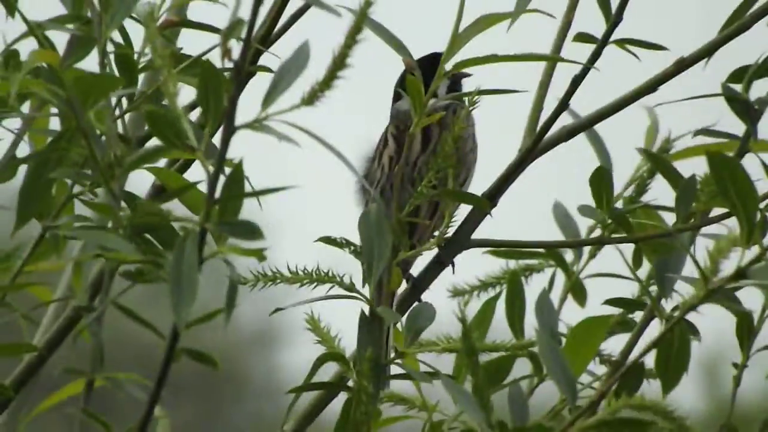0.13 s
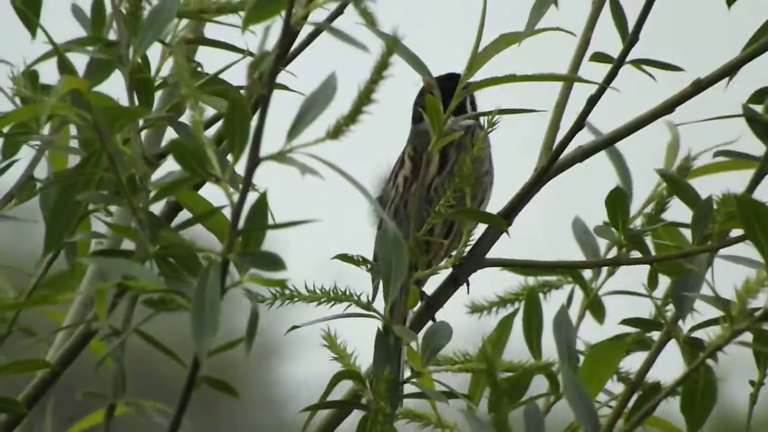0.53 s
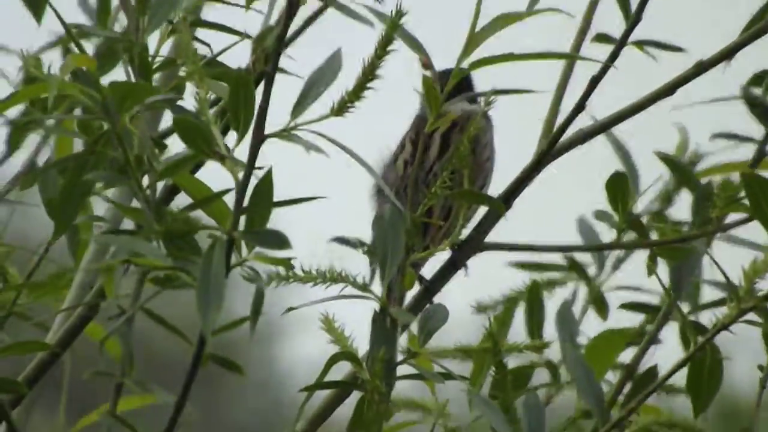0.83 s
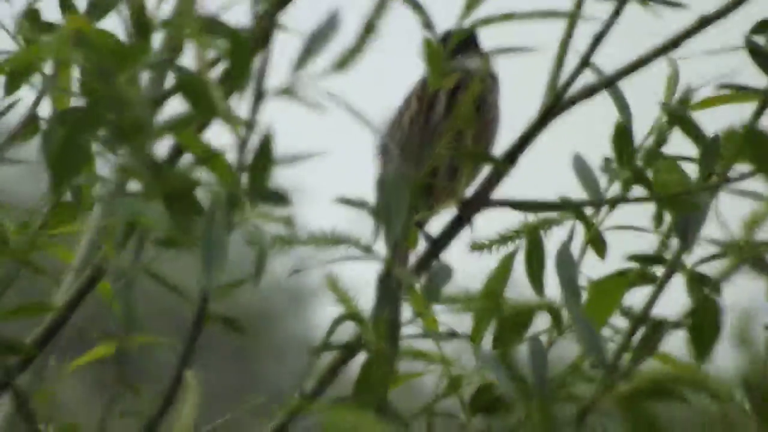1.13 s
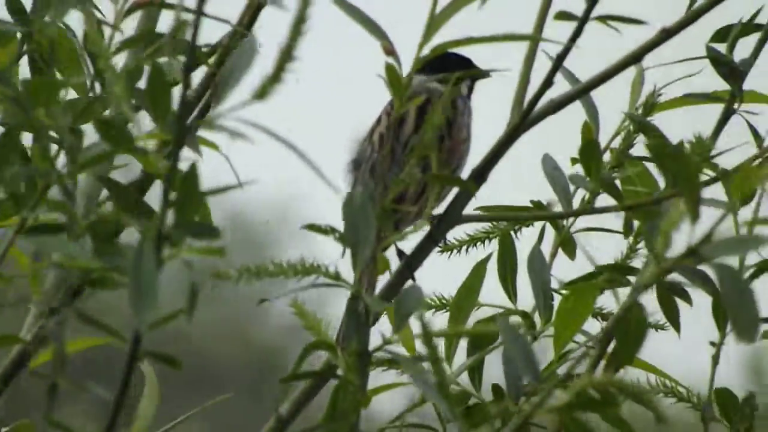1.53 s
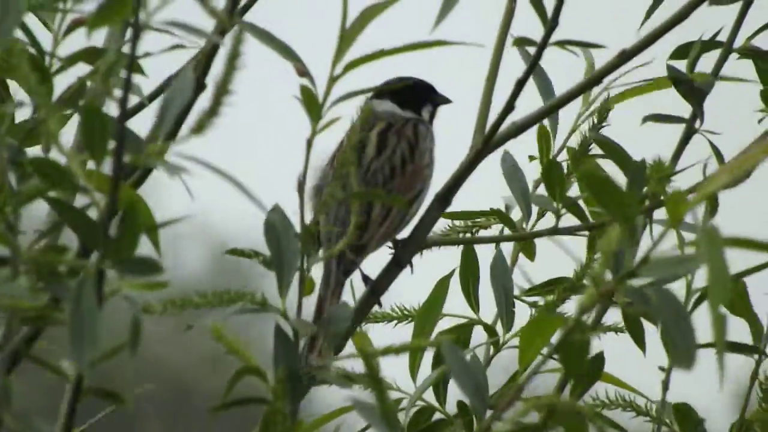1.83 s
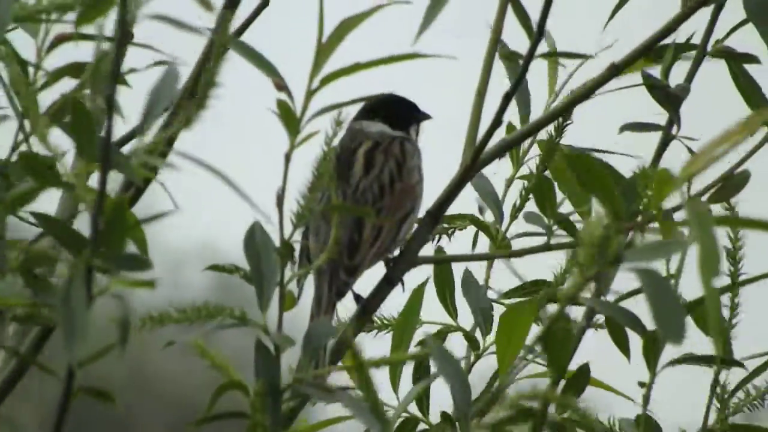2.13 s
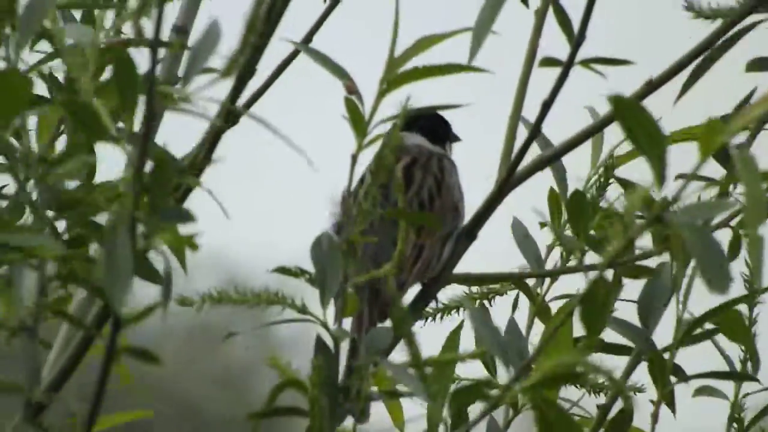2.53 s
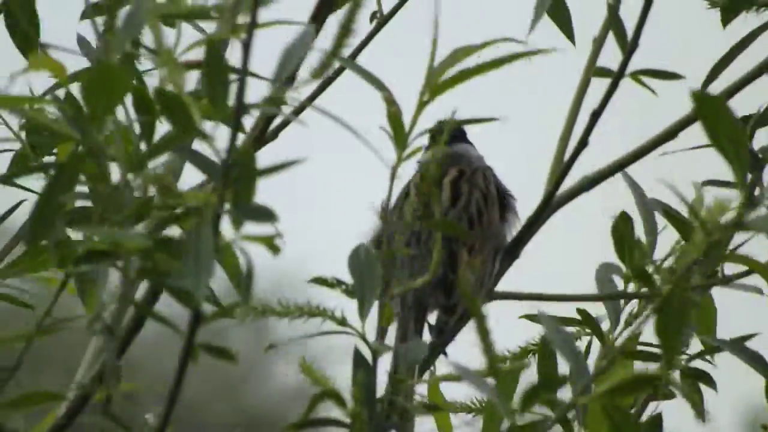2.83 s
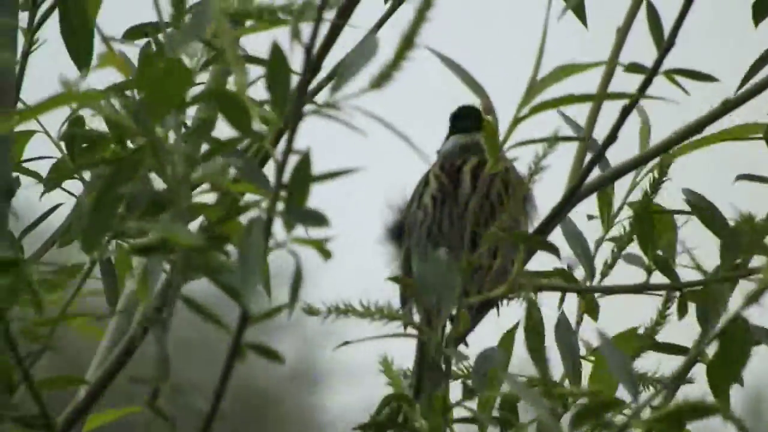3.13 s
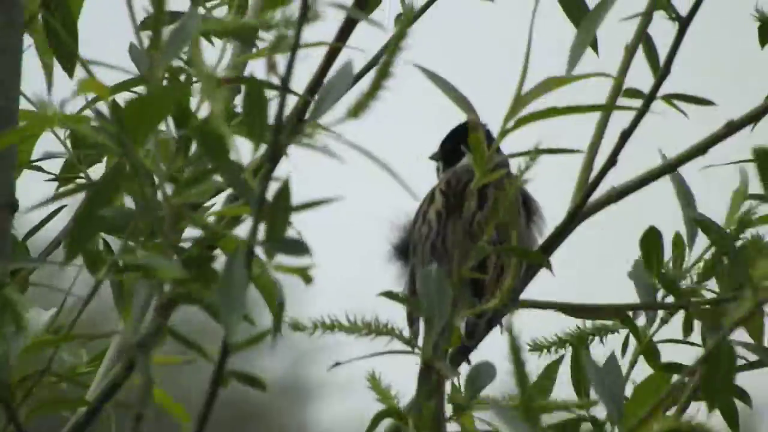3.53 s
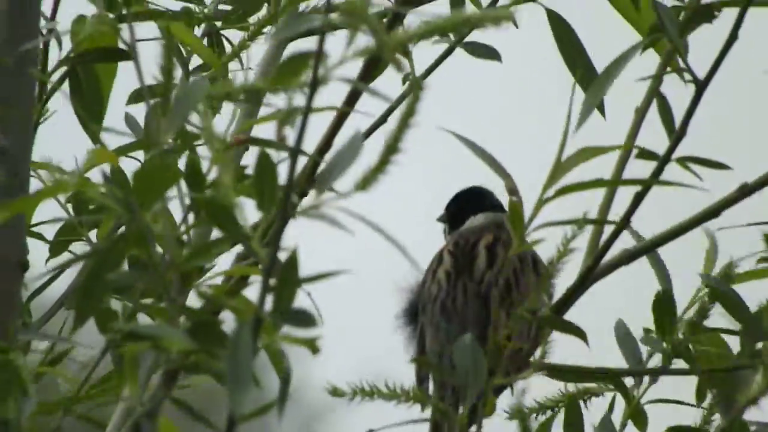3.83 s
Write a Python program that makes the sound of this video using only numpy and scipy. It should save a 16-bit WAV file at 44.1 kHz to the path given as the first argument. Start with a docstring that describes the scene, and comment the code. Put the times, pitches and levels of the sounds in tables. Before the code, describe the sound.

A small songbird a few metres away sings quick whistles, a buzz and two short trills. Fainter birds then chip and whistle among the trees, a twig snaps, and light wind rumbles on the microphone.

```python
"""Songbird in light wind.

A small bird a few metres off ends its phrase: whistled sweeps, a long buzz, two short trills.
Further away, birds whistle, chip and grunt over a faint chorus. All calls are modulated tones.
A twig snaps, ringing its resonances. Foliage scatters echoes; wind rumbles on the microphone.
Narrow stereo: the left channel lags by one sample."""
import sys
import numpy as np
from scipy import signal
from scipy.fft import rfft, irfft
from scipy.io import wavfile
from scipy.ndimage import uniform_filter1d

SR = 44100
rng = np.random.default_rng(int(sys.argv[2]) if len(sys.argv) > 2 else 0)


def digitize_waveform(pressure):
    """Quantize a signal to 16-bit integers and store it at the path in sys.argv[1].

    Rows of a 2-D input are taken as channels; values are limited to [-1, 1].
    """
    field = np.atleast_2d(pressure).T
    bounded = np.clip(field, -1, 1)
    quanta = np.round(bounded * 32767).astype(np.int16)
    wavfile.write(sys.argv[1], SR, quanta)


N = 176400

# near whistles, one curve per note: t/s, f/Hz, level/dB
NEAR_NOTES = [
    [(0.0, 4530, -10), (0.008, 4620, -18.5), (0.016, 4790, -12.5)],
    [(0.002, 3720, -50), (0.01, 3610, -23), (0.025, 3910, -19), (0.038, 4200, -13.5), (0.045, 4400, -12)],
    [(0.104, 5550, -48), (0.112, 6200, -34), (0.12, 6550, -32), (0.13, 6400, -33), (0.145, 6060, -27.5),
     (0.155, 6090, -31), (0.159, 6600, -32), (0.163, 8220, -43), (0.167, 7440, -59), (0.171, 6030, -34),
     (0.175, 4930, -14.5), (0.18, 4520, -10.5), (0.19, 4060, -19.5)],
    [(0.406, 3370, -26), (0.415, 3220, -23), (0.424, 3130, -24)],
    [(0.443, 3640, -40), (0.446, 3350, -15), (0.45, 3250, -30)],
    [(0.478, 5560, -52.5), (0.495, 5010, -25), (0.511, 4590, -13.5), (0.515, 5480, -36.5),
     (0.518, 4340, -21), (0.524, 4210, -18.5), (0.535, 4020, -37), (0.552, 4120, -39)],
    [(0.582, 5080, -45), (0.588, 5500, -53), (0.597, 4960, -26), (0.607, 4670, -17), (0.612, 6170, -49),
     (0.616, 4420, -21), (0.622, 4140, -20), (0.632, 4250, -42), (0.645, 4330, -38)],
    [(0.702, 6380, -46), (0.707, 4420, -28), (0.712, 6200, -40.5), (0.718, 6700, -52), (0.727, 6960, -50.2),
     (0.745, 6670, -46), (0.772, 6900, -62.5)],
    [(0.752, 3510, -40), (0.775, 3556, -27.5), (0.795, 3820, -25.5), (0.802, 3510, -19), (0.808, 3120, -16)],
    [(0.805, 5245, -40.5), (0.812, 4180, -26), (0.822, 3493, -26.5), (0.828, 3320, -35), (0.84, 3370, -31),
     (0.855, 3000, -26)],
]
# long buzz: t/s, f/Hz, level/dB, warble rate/Hz, depth/Hz, throb/0-1
BUZZ_CURVE = [(.188, 4050, -19, 172, 60, 0), (.204, 3830, -20, 171, 260, .1),
              (.228, 3830, -15.5, 170, 290, .1), (.3, 3540, -16.5, 163.5, 350, .15),
              (.33, 3430, -17.5, 160, 390, .75), (.347, 3330, -21, 160, 330, .8),
              (.353, 3150, -18, 160, 120, .35), (.366, 3230, -21, 160, 30, 0)]
# trills: t/s, length/s, f/Hz, level/dB, swell/dB, warble rate/Hz, depth/Hz, throb/0-1, end sag/Hz
TRILL_NOTES = [(0.4515, 0.0365, 3400, -22, 6, 98, 130, 0.22, 250),
               (0.5462, .0385, 3260, -19.5, 5, 104, 90, 0.72, 20)]
# far whistles, one curve per note: t/s, f/Hz, level/dB
FAR_NOTES = [
    [(0.095, 972, -51), (0.11, 1010, -47), (0.135, 984, -48)],
    [(0.147, 2930, -26), (0.16, 2950, -26), (0.18, 2760, -26.5)],
    [(0.195, 1128, -53), (0.215, 1059, -47), (0.255, 1043, -44), (0.3, 1016, -57)],
    [(0.31, 1322, -45), (0.36, 1354, -45), (0.44, 1361, -49.5)],
    [(0.505, 995, -47), (0.54, 1016, -46.5), (0.585, 1013, -51)],
    [(0.585, 3550, -43.5), (0.61, 3710, -36.5), (0.635, 4040, -40)],
    [(0.935, 1347, -46), (0.98, 1350, -49.5), (1.02, 1365, -49)],
    [(0.992, 4560, -34), (1.0, 3960, -43), (1.015, 3700, -30), (1.035, 3720, -43), (1.052, 4000, -41),
     (1.065, 3990, -36)],
    [(1.07, 3390, -29), (1.09, 3440, -38), (1.125, 3560, -29)],
    [(1.105, 1013, -52), (1.13, 1080, -51), (1.155, 1060, -56)],
    [(1.18, 1165, -53), (1.215, 1010, -54)],
    [(1.31, 3570, -66), (1.33, 3430, -27), (1.35, 3430, -46)],
    [(1.42, 4320, -43), (1.445, 4300, -45), (1.47, 4320, -45)],
    [(1.473, 4380, -36), (1.48, 3820, -43), (1.492, 3307, -21.5), (1.505, 3590, -35), (1.53, 3460, -30.5),
     (1.545, 3620, -32), (1.558, 4130, -36), (1.57, 3920, -40)],
    [(1.555, 2880, -43), (1.6, 2900, -53), (1.645, 2809, -34), (1.668, 3340, -33.5)],
    [(1.6, 1330, -47), (1.63, 1339, -47), (1.665, 1380, -52)],
    [(1.81, 3024, -35), (1.83, 2950, -40), (1.86, 2880, -40)],
    [(1.908, 2745, -28), (1.92, 2760, -30), (1.93, 3060, -46)],
    [(2.43, 3590, -43), (2.445, 3330, -38), (2.458, 3060, -34)],
    [(2.69, 2770, -63), (2.705, 3020, -38.4), (2.73, 3100, -34.5), (2.77, 3170, -42)],
    [(2.885, 3170, -33), (2.9, 3290, -36), (2.915, 3230, -35)],
    [(3.165, 4050, -45), (3.175, 3770, -41), (3.195, 3830, -48)],
    [(3.295, 4140, -42), (3.315, 3770, -33), (3.335, 3950, -44), (3.35, 4080, -39), (3.4, 4060, -52)],
    [(3.31, 4670, -42), (3.325, 4360, -42), (3.34, 4570, -58)],
    [(3.325, 2093, -41), (3.35, 2140, -46), (3.39, 2210, -49)],
    [(3.372, 4000, -45), (3.39, 3430, -34.5), (3.403, 3130, -30)],
    [(3.4, 2960, -38), (3.44, 2985, -39), (3.485, 2980, -40)],
    [(3.435, 6800, -72.1), (3.47, 6090, -54.5), (3.53, 5360, -59)],
    [(3.445, 2330, -44), (3.49, 1977, -46), (3.56, 1560, -51)],
    [(3.65, 3100, -29.5), (3.67, 3190, -30), (3.715, 3148, -26.5), (3.745, 3110, -41), (3.78, 3115, -36)],
    [(3.7, 2310, -44), (3.75, 2225, -45), (3.8, 2172, -45), (3.84, 2270, -39), (3.9, 2326, -39.5),
     (3.96, 2340, -57)],
    [(3.72, 1910, -50), (3.75, 1930, -51), (3.82, 1960, -45)],
    [(3.76, 4800, -47), (3.78, 4340, -49)],
    [(3.82, 3150, -35), (3.85, 3130, -38), (3.88, 3410, -33)],
    [(3.86, 3550, -53), (3.9, 3494, -43), (3.925, 3570, -33)],
    [(3.865, 5690, -61), (3.92, 5700, -58), (3.985, 6010, -78)],
]
# rattle on a whistle: start/s, end/s, rate/Hz, depth/Hz, throb/dB
NEAR_NOTE_RATTLE = (.752, .799, 250, 170, 4.)
FAR_NOTE_RATTLE = (.286, .45, 27.5, 45, 6.)
# rising chips: t/s, peak/dB
CHIP_CALLS = [(1.142, -21.5), (1.2275, -21.5), (1.3295, -20), (1.4305, -21), (1.5295, -21.5),
              (1.646, -27.5), (1.7733, -26)]
# twig crackles: t/s, push/dB, t60/s, contact/ms
CRACKLES = [(1.2045, -7, .3, .1), (1.206, -3, 0.11, 0.09), (1.2084, 0, 0.028, .1), (1.21, 10, .01, .02),
            (1.2135, 1, .2, 0.11), (2.92, -2, 0.013, 0.4), (2.9222, -6, .03, .6)]
# twig resonances: f/Hz, width/Hz, gain/dB
TWIG_MODES = [(2775, 330, 2), (3140, 306, 7.5), (4100, 1470, -11.5), (1040, 550, -26), (1990, 1300, -24),
              (6300, 1700, -18.5), (9900, 1900, -19.5), (13500, 7900, -33)]
# far bird's grunts: t/s, level/dB, f/Hz
GRUNT_CALLS = [(0.812, -39, 300), (0.913, -37, 260), (1.005, -38.5, 259.6), (1.105, -35.5, 267.4),
               (1.142, -37, 248), (1.197, -42, 303)]
# grunt harmonics 1-4: gain/dB
GRUNT_HARMONICS_DB = [0, -13, -25, -10.5]
# wind rumble: t/s, level/dB
WIND_LEVEL = [(0.0, -26.5), (0.52, -32), (0.99, -33.5), (1.22, -31), (1.41, -32), (1.56, -32.5),
              (1.77, -27), (1.99, -26.5), (2.22, -25.5), (2.39, -28.5), (2.55, -28), (3.16, -27.5),
              (3.55, -35.5), (3.75, -34.5), (4.0, -18.5)]
# rumble spectrum: f/Hz, relative density/dB
WIND_SPECTRUM = [(5.9, -33), (10, 1.5), (21, 0.5), (36, -7.5), (63, -15.5), (97, -24.5), (130, -37),
                 (170, -60), (290, -120)]
# buffets on the microphone: centre t/s, peak/dB, f/Hz, length/s
WIND_BUFFETS = [(1.596, -21.5, 45, 0.057), (2.345, -20, 29.8, 0.074), (3.018, -14, 50.3, 0.041),
                (3.263, -18, 40.9, 0.18), (3.939, -23, 49.5, 0.061)]
# low rustle: centre t/s, level/dB, half-width/s
LOW_RUSTLE = (2.67, -43, 0.1)
# dawn chorus: t/s, level/dB
CHORUS_LEVEL = [(0, -40), (.8, -41.5), (1.6, -44.5), (2.4, -47), (3.2, -44), (4, -48.5)]
# ambient noise: f/Hz, relative density/dB
AIR_SPECTRUM = [(60, -45), (100, -6), (183, -6.5), (330, -9.5), (570, -12), (900, -15), (1300, -15),
                (1900, -14.5), (2400, -12), (2900, -3.5), (3600, -13), (4400, -21.5), (5500, -32),
                (7000, -35.5), (10000, -38), (13000, -38), (16000, -52.5)]

NEAR_EDGE_S, NEAR_FLUTTER_DB = .002, 1
BUZZ_JITTER, BUZZ_START_TURNS, BUZZ_FLUTTER_DB = .06, -.187, 1.5
FAR_EDGE_S, FAR_FLUTTER_DB, FAR_FADING_DB = .008, 2.2, 3
SECOND_HARMONIC_DB, UPPER_HARMONICS_DB, WAVER_PER_DB = -46.5, -55, .0013
CHIP_S, CHIP_FROM_HZ, CHIP_TO_HZ = .0145, 2800, 3232
CHIP_LOW_HZ, CHIP_LOW_DB, CHIP_BREATH_DB = 2316, -24, -27
CRACKLE_CLICK, CRACKLE_NOISE, FIRST_SNAP_END_S = 3.7, .33, 1.2175
GRUNT_S, GRUNT_RISE = .041, .13
CHORUS_HZ, CHORUS_HIGH_HZ, CHORUS_HIGH_DB = 3046, 4330, -12
CHORUS_NOTE_S, CHORUS_SPREAD, CHORUS_GLIDE, CHORUS_SCATTER_DB = .02493, .093, .0807, .5
AIR_DB, AIR_DRIFT_DB, TREBLE_HZ, TREBLE_FLICKER_DB = -39.5, .22, 7000, 1.3
HISS_DB, MONO_BELOW_HZ, TOP_HZ = -75, 1300, 15800


def whistles(notes, edge_s, flutter_db, rattle, fading_db=0):
    """Tones on pitch and level curves; one note rattles. fading_db: level dips from moving air."""
    out = np.zeros(N)
    from_s, to_s, rate_hz, depth_hz, throb_db = rattle
    dips_db = -fading_db * np.abs(wander(90))
    for note in notes:
        times, hz, db = np.array(note, float).T
        start = times[0] - edge_s / 2
        t = np.arange(start, times[-1] + edge_s / 2, 1 / SR)
        rattling = np.clip(np.minimum(t - from_s, to_s - t) / .004, 0, 1) * (abs(times[0] - from_s) < .03)
        phase = 2 * np.pi * rate_hz * (t - from_s)
        pitch_hz = uniform_filter1d(np.interp(t, times, hz), 90) + depth_hz * rattling * np.sin(phase)
        level_db = np.interp(t, times, db) + throb_db * rattling * np.cos(phase)
        level_db += dips_db[np.abs(t * SR).astype(int)]
        add(out, max(start, 0), tone(pitch_hz, level_db, edge_s, flutter_db)[t >= 0])
    return out


def buzz():
    """Fast pitch warble; the level throbs twice per cycle."""
    out = np.zeros(N)
    times, *columns = np.array(BUZZ_CURVE).T
    t = np.arange(times[0], times[-1], 1 / SR)
    hz, db, rate_hz, depth_hz, throb = (np.interp(t, times, column) for column in columns)
    rate_hz *= 1 + BUZZ_JITTER * wander(250)[:len(t)]
    phase = 2 * np.pi * (np.cumsum(rate_hz) / SR + BUZZ_START_TURNS)
    beat = 1 - throb * np.cos(2 * phase + .3)
    add(out, times[0], beat * tone(hz + depth_hz * np.cos(phase), db, NEAR_EDGE_S, BUZZ_FLUTTER_DB))
    return out


def trills():
    """Short swelling warbles, one throb per cycle; the pitch sags at the end."""
    out = np.zeros(N)
    for start, length_s, hz, db, swell_db, rate_hz, depth_hz, throb, sag_hz in TRILL_NOTES:
        t = np.arange(0, length_s, 1 / SR)
        phase = 2 * np.pi * rate_hz * t
        beat = 1 - throb * np.clip((.85 * length_s - t) / .005, 0, 1) * np.cos(phase + .25)
        pitch_hz = hz - depth_hz * np.cos(phase + 1.1) - sag_hz * (t / length_s) ** 4
        level_db = db + swell_db * np.minimum(1.9 * t / length_s, 1)
        add(out, start, beat * tone(pitch_hz, level_db, NEAR_EDGE_S))
    return out


def chips():
    """Short upward sweeps with a weak low note and breath noise."""
    out, u = np.zeros(N), np.linspace(0, 1, int(CHIP_S * SR))
    sweep_hz = CHIP_FROM_HZ + (CHIP_TO_HZ - CHIP_FROM_HZ) * u
    for start, db in CHIP_CALLS:
        sweep = tone(sweep_hz, db - 7 + 4 * u, edge_s=.0029, flutter_db=1)
        noise = band(rng.standard_normal(len(u)), hz=4700, width_hz=1000)
        breath = unit_rms(band(noise, hz=4700, width_hz=1000)) * np.hanning(len(u))
        low_note = tone(np.full(len(u), CHIP_LOW_HZ), db + CHIP_LOW_DB, edge_s=.003)
        add(out, start, sweep + low_note + undb(db + CHIP_BREATH_DB) * breath)
    return out


def twig():
    """Clicks with decaying noise drive broad resonances; longer contact is duller."""
    push, t = np.zeros(N), np.arange(0, .04, 1 / SR)
    for start, db, t60_s, contact_ms in CRACKLES:
        gate = (start + t < FIRST_SNAP_END_S) | (start > FIRST_SNAP_END_S)
        burst = CRACKLE_NOISE * rng.standard_normal(len(t)) * gate
        burst[0] = CRACKLE_CLICK
        pole = np.exp(-2 * np.pi * 1000 / (contact_ms * SR))
        add(push, start, signal.lfilter([1 - pole], [1, -pole], burst * undb(db - 60 * t / t60_s)))
    return sum((-1) ** k * undb(db) * band(push, hz, width_hz)
               for k, (hz, width_hz, db) in enumerate(TWIG_MODES))


def grunts():
    """Soft, low harmonic calls, rising slightly."""
    out, t = np.zeros(N), np.arange(0, GRUNT_S, 1 / SR)
    for start, db, hz in GRUNT_CALLS:
        phase = 2 * np.pi * hz * t * (1 + GRUNT_RISE * (t / GRUNT_S - 1) / 2)
        wave = sum(undb(gain_db) * np.sin(k * phase) for k, gain_db in enumerate(GRUNT_HARMONICS_DB, 1))
        add(out, start - GRUNT_S / 4, undb(db) * np.hanning(len(t)) * wave)
    return out


def wind():
    """Wind on the microphone: rumble, low buffets, one rustle."""
    t = np.arange(N) / SR
    level_db = np.interp(t, *np.array(WIND_LEVEL).T)
    out = coloured_noise(WIND_SPECTRUM) * undb(level_db + .57 * wander(36))
    for centre_s, db, hz, length_s in WIND_BUFFETS:
        envelope = undb(db) * np.exp(-8 * ((t - centre_s) / length_s) ** 2)
        out += envelope * np.cos(2 * np.pi * hz * (t - centre_s - .012))
    centre_s, db, half_width_s = LOW_RUSTLE
    rustle = unit_rms(band(rng.standard_normal(N), hz=180, width_hz=180))
    rustle *= undb(db + 3.5 * wander(64.77))
    return out + rustle * np.exp(-((t - centre_s) / half_width_s) ** 2)


def chorus(count=1100):
    """Distant birds: short random glides round one pitch, about a third higher and weaker."""
    out, u = np.zeros(N), np.linspace(-1, 1, int(CHORUS_NOTE_S * SR))
    for when, pick in rng.random((count, 2)):
        offset, glide, scatter = rng.standard_normal(3)
        centre_hz, db = (CHORUS_HIGH_HZ, CHORUS_HIGH_DB) if pick < 1 / 3 else (CHORUS_HZ, 0)
        hz = centre_hz * np.exp(CHORUS_SPREAD * offset + CHORUS_GLIDE * glide * u)
        add(out, when * N / SR, tone(hz, db + CHORUS_SCATTER_DB * scatter, CHORUS_NOTE_S / 2))
    return unit_rms(out) * undb(np.interp(np.arange(N) / SR, *np.array(CHORUS_LEVEL).T))


def air():
    """Near-steady ambient noise; the treble flickers."""
    noise = coloured_noise(AIR_SPECTRUM) * undb(AIR_DB + AIR_DRIFT_DB * wander(2.2))
    treble = signal.sosfilt(signal.butter(2, TREBLE_HZ, "high", fs=SR, output="sos"), noise)
    return noise + treble * (undb(TREBLE_FLICKER_DB * wander(20)) - 1)


def echo(x, db, t60_s):
    """Decaying tail scattered by leaves and reeds; no direct sound."""
    t = np.arange(0, .8, 1 / SR)
    tail = rng.standard_normal(len(t)) * undb(-60 * t / t60_s) * (t > .002)
    return undb(db) * signal.fftconvolve(x, tail / np.linalg.norm(tail))[:N]


def tone(hz, db, edge_s, flutter_db=0):
    """Bird voice: sine at rms level db, faint harmonics, soft ends, level and pitch flutter."""
    t = np.arange(len(hz)) / SR
    fade = np.sin(np.pi / 2 * np.clip(np.minimum(t, t[::-1]) / edge_s, 0, 1)) ** 2
    level_db = db + flutter_db * smooth_unit(rng.standard_normal(len(t)), 120)
    waver = WAVER_PER_DB * flutter_db * smooth_unit(rng.standard_normal(len(t)), 300)
    phase = 2 * np.pi * (np.cumsum(hz * (1 + waver)) / SR + rng.random())
    wave = np.sin(phase) + undb(SECOND_HARMONIC_DB) * np.sin(2 * phase)
    wave += undb(UPPER_HARMONICS_DB) * (np.sin(3 * phase) + np.sin(4 * phase))
    return np.sqrt(2) * fade * undb(level_db) * wave


def coloured_noise(spectrum):
    """Shaped noise, rms 1."""
    hz, db = np.array(spectrum, float).T
    bins_hz = np.maximum(np.arange(N // 2 + 1) * SR / N, 1)
    gain = undb(np.interp(np.log(bins_hz), np.log(hz), db))
    return unit_rms(irfft(rfft(rng.standard_normal(N)) * gain, N))


def wander(rate_hz):
    """Smooth random drift, rms 1."""
    hold = int(SR / rate_hz)
    return smooth_unit(np.repeat(rng.standard_normal(N // hold + 1), hold), hold)


def smooth_unit(x, samples):
    return unit_rms(uniform_filter1d(uniform_filter1d(x, samples), samples)[:N])


def band(x, hz, width_hz):
    return signal.lfilter(*signal.iirpeak(hz, hz / width_hz, fs=SR), x)


def undb(db):
    return 10 ** (np.asarray(db) / 20)


def unit_rms(x):
    return x / np.sqrt(np.mean(x ** 2))


def add(out, start_s, x):
    i = int(start_s * SR)
    out[i:i + len(x)] += x[:N - i]


def scene():
    """Mono mix with echoes; left delayed one sample."""
    near = whistles(NEAR_NOTES, NEAR_EDGE_S, NEAR_FLUTTER_DB, NEAR_NOTE_RATTLE) + buzz() + trills()
    far = whistles(FAR_NOTES, FAR_EDGE_S, FAR_FLUTTER_DB, FAR_NOTE_RATTLE, FAR_FADING_DB)
    far += chips() + chorus()
    snaps = twig()
    near += echo(near, db=-12, t60_s=.12) + echo(near, db=-14, t60_s=.29)
    far += echo(far, db=-4, t60_s=.19)
    snaps += echo(snaps, db=-20, t60_s=.1)
    mono = near + far + snaps + grunts() + wind() + air()
    return np.array([np.append(mono[0], mono[:-1]), mono])


def record(dry):
    """Faint hiss per channel; bass the same in both channels; steep top cut."""
    wet = dry + undb(HISS_DB) * rng.standard_normal(dry.shape)
    side = (wet[0] - wet[1]) / 2
    low_side = signal.sosfiltfilt(signal.butter(1, MONO_BELOW_HZ, fs=SR, output="sos"), side)
    wet -= np.array([low_side, -low_side])
    return signal.sosfilt(signal.ellip(8, .2, 70, TOP_HZ, fs=SR, output="sos"), wet)


dry = scene()
out = record(dry)
digitize_waveform(out)
```